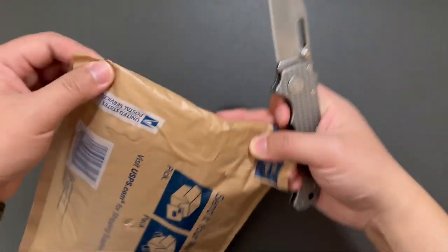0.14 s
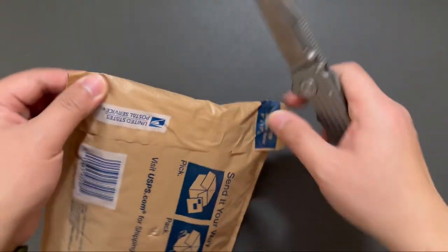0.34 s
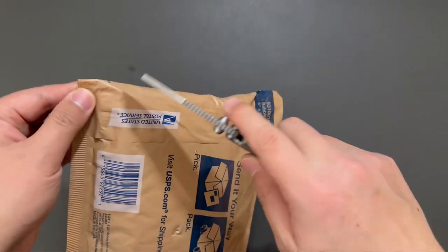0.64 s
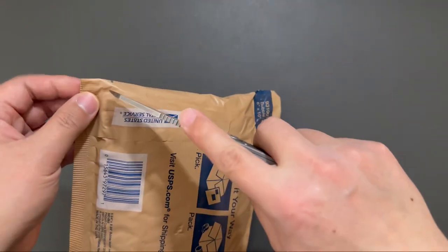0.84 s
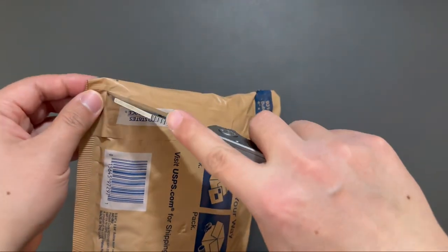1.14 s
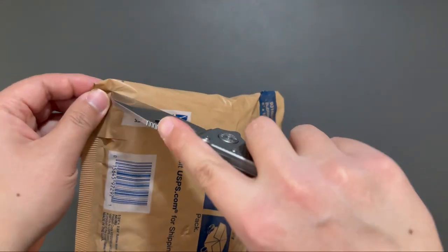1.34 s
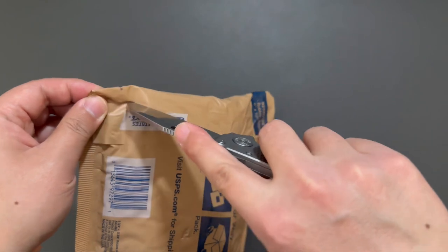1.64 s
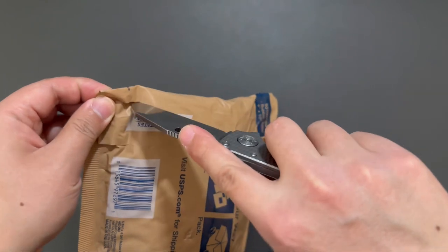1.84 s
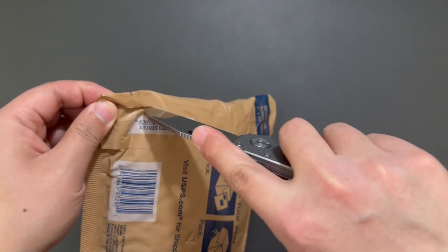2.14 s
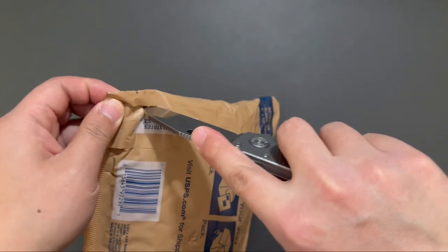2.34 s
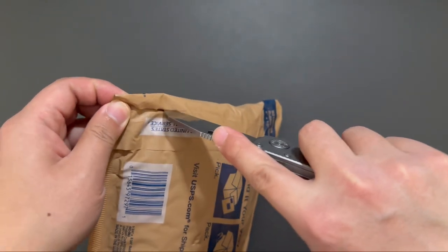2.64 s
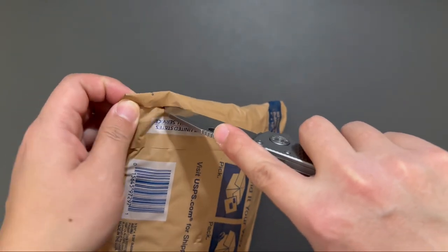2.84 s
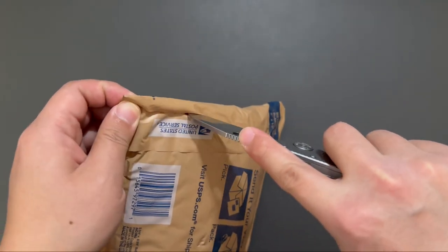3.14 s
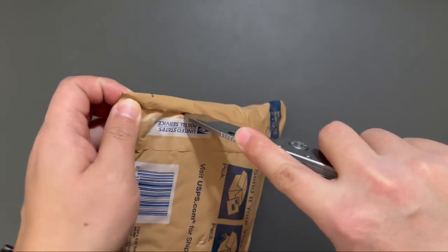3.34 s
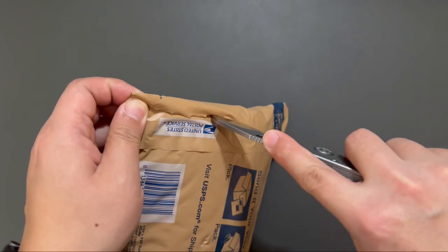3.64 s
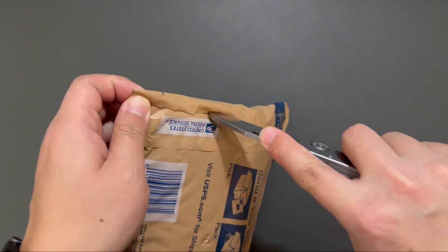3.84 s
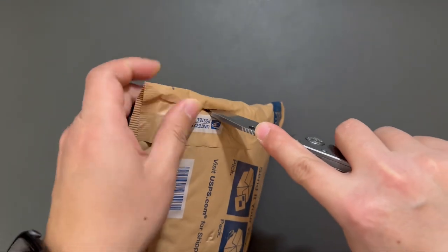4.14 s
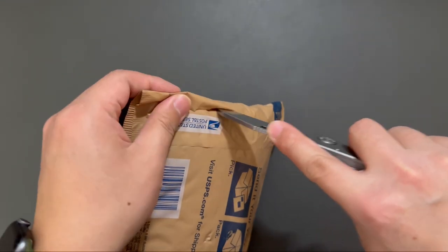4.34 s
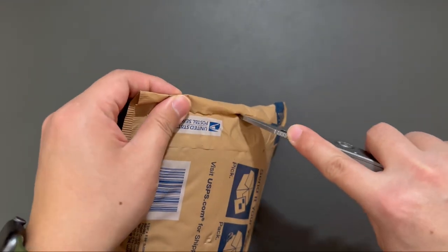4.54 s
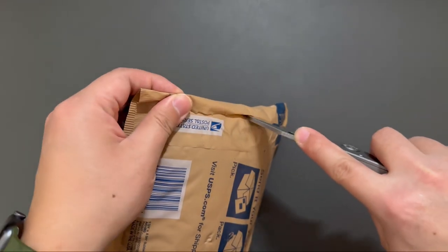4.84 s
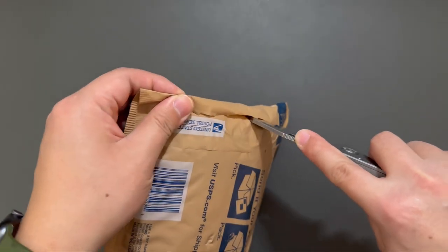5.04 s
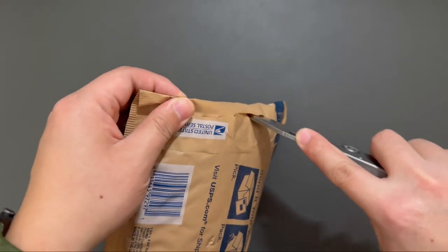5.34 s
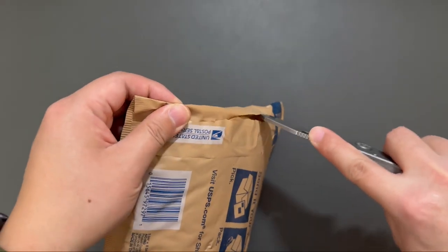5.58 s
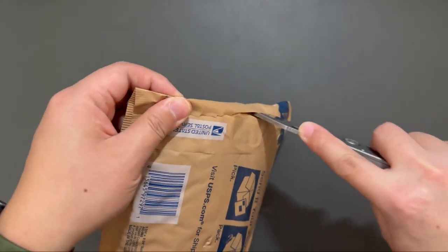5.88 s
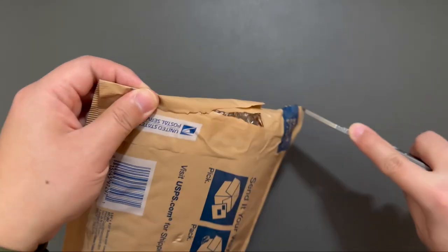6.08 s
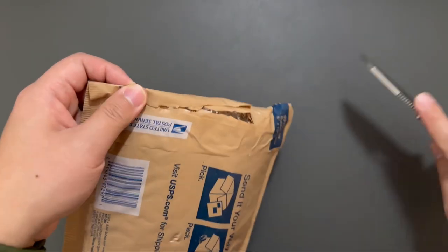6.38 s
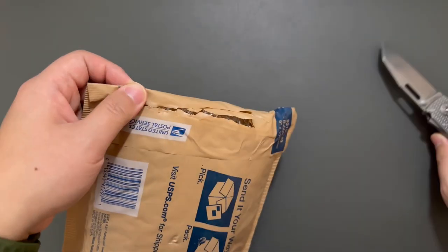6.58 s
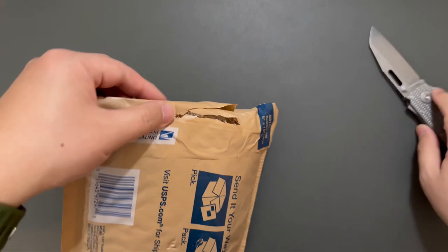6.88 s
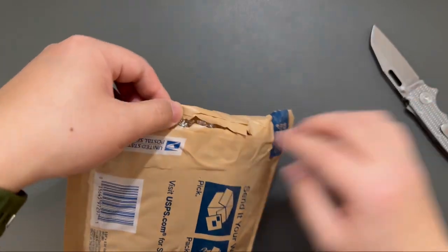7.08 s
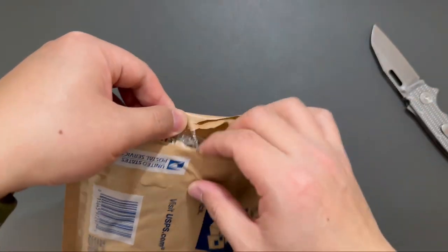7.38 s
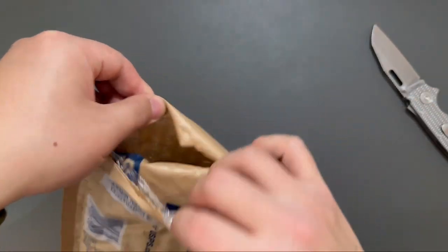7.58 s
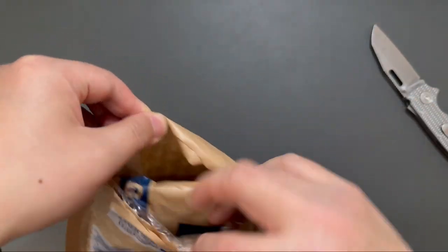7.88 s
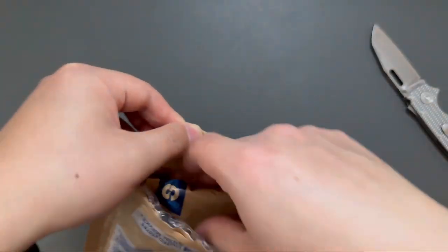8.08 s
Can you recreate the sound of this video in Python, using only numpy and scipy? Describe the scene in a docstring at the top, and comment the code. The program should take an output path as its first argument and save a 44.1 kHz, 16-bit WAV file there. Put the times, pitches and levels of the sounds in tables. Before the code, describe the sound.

Very close, dry sound of a padded paper envelope being opened over a desk in a small quiet room, with faint steady air noise and a low wavering hum throughout. From 0 to 0.3 seconds the paper rustles with a few crisp snaps, then thins to small ticks until about 1.5. Sharp crackles come near 1.7 and 2.1, another at 2.5. From 3 seconds a blade slits the paper in irregular tugs: clustered bright snaps and soft hollow pouch thumps, strong around 3.5, 4.5 and 4.8, continuing through 5.5 and peaking at 5.9 with a hard snap and bump. From 6.1 to 6.8 it is quieter, just light ticks. At about 6.9 the knife lands with a dull, briefly ringing desk knock. From 7.1 to 8.2 the envelope is pulled open with broad, dense rustling, crackles and low rubbing.

```python
"""A padded paper envelope is gripped, slit along its top with a pocket knife and pulled open over a desk.
Creases snap and crackle as sharp edges with short bursts of noise; sliding sheets rustle as flickering noise.
The stiff pouch thumps as ringing modes when jerked and rumbles as low noise when rubbed on the desk.
Knife, pouch and knuckles knock on the desk top, which rings too. The knife is laid down near the end.
The quiet room adds short echoes, steady air noise and a wavering motor hum."""
import sys
import numpy as np
from scipy import signal
from scipy.fft import rfft, irfft, next_fast_len
from scipy.io import wavfile

SR = 44100
rng = np.random.default_rng(int(sys.argv[2]) if len(sys.argv) > 2 else 0)


def undo_db(level):
    """Turn decibels back into plain size, where 20 dB means ten times bigger."""
    steps = np.asarray(level, float) / 20
    return 10 ** steps


def master(y):
    """Save y as 16-bit WAV."""
    cut = np.clip(np.atleast_2d(y).T, -1, 1)
    pcm = np.round(cut * 32767)  # scale
    wavfile.write(sys.argv[1], SR, pcm.astype(np.int16))


N = 362281   # length [samples]

# Levels in these tables are relative: the functions below add offsets to most of them.
# tugs of the blade or squeezes of the hand:
# (time of full strength [s], time held [s], rustle level [dB], dullness [dB])
TUG_EVENTS = [(0.08, 0.074, -45.5, -3.5), (0.168, .06, -43.5, -5), (0.4, 0.034, -55, 1.5),
              (1.08, 0.0089, -62, -1), (1.531, 0.062, -50, -2.5), (1.69, 0.017, -63, -15),
              (2.09, 0.066, -51, -15.5), (2.301, 0.0059, -49.5, -11), (2.487, 0.0027, -45, -3.5),
              (2.74, 0.16, -50.5, -14.5), (3.01, 0.031, -43.5, -8), (3.18, 0.014, -52, -9),
              (3.286, 0.0038, -47, -2.5), (3.431, 0.022, -46, -7), (3.5, 0.079, -47, -10),
              (3.699, 0.0035, -56, 5.5), (3.83, .24, -50.5, -5.5), (4.208, 0.0026, -46.5, -12),
              (4.309, 0.0051, -43, -2.5), (4.52, 0.0041, -41.5, -20), (4.831, 0.004, -40.5, -2),
              (5.118, 0.0084, -42.5, -8.5), (5.307, 0.011, -45, -2), (5.502, 0.026, -40.5, -3),
              (5.747, 0.043, -48.5, -6), (5.928, 0.0019, -31.5, -2), (6.01, 0.096, -49.5, 1),
              (6.377, 0.0045, -53, -3), (6.59, 0.027, -60.5, 9), (6.887, 0.0045, -40.5, -4.5),
              (7.16, 0.22, -43, -10.5), (7.41, 0.042, -35.5, -8), (7.5, 0.089, -38, -9),
              (7.66, 0.047, -54, 13), (7.827, 0.19, -45.5, -5.5), (8.079, 0.11, -40, -11)]
# fingers holding the envelope between tugs: (time [s], rustle level [dB], dullness [dB])
GRIP_CURVE = [(0, -51.5, 7.5), (.35, -55.5, 2.5), (.66, -67.5, -2.5), (1.24, -69, 2), (1.4, -63.5, -22),
              (1.92, -60, -26), (2.3, -85, 5), (2.9, -54.5, -6), (3.4, -65, -2), (3.76, -69, -2),
              (4.4, -55, -2), (5.0, -61.5, -7), (5.66, -65.5, 2), (6.3, -63.5, -14), (6.7, -59, -12.5),
              (7.1, -52.5, -2), (8.21, -50, -30)]
# creases buckling and fibres parting: (time [s], strength near 3.5 kHz [dB],
# fullness near 1.3 kHz against that [dB], brightness near 7.5 kHz against that [dB])
CREASE_SNAPS = [(0.084, -39, -11, -22), (0.1102, -24, -6, -7), (0.12, -41, 0, 1), (0.1284, -43.5, 2, 9),
                (0.166, -33, -8, -6), (0.1742, -30, -26, 6.5), (0.2205, -17.5, -6, -12.5),
                (0.24, -38, 4, -10), (0.2515, -27, -5, -28), (0.294, -49, 5, -11), (0.379, -41, -1, 15.5),
                (0.396, -45, -8, 5), (0.427, -50, 12, -10), (0.462, -44, -6, 2), (0.496, -49, -5, 6),
                (0.516, -46, 5, 3), (0.604, -35, -8, -5), (0.6881, -44.5, 12.5, -7), (0.762, -33, 5.5, -15),
                (0.7853, -31, 6.5, -9.5), (0.816, -38.5, 8, -4), (0.825, -35, -4, -3),
                (0.85, -33.5, -1.5, 0.5), (0.9982, -34, 9.5, -7), (1.0159, -31.5, -4, 1),
                (1.0242, -37.5, 0, -12), (1.0847, -52, -5, 12), (1.14, -49, 14, -8),
                (1.169, -34.5, -6.5, -9), (1.257, -30.5, -4.5, 0.5), (1.419, -43.5, 0, -12),
                (1.505, -49, 18.5, -9), (1.5404, -39, 0, -5), (1.5514, -35.5, 7.5, 8),
                (1.6133, -31.5, 2, -8), (1.636, -36, 0, 11), (1.6597, -24.5, -8, -17),
                (1.6742, -29.5, -5, 19.5), (2.0364, -34.5, 7, 5.5), (2.0606, -38, 2, 2),
                (2.0789, -16, -17, -4), (2.1105, -22.5, -19, -3), (2.292, -33, 4.5, 7),
                (2.4416, -36.5, 12, 2.5), (2.4885, -21, 2, -11), (2.5061, -30, 5, 3), (2.7194, -43, 15, -2),
                (2.7423, -31.5, -4, 15), (2.8576, -29, 0.5, 2), (2.9093, -32, -4, 7.5),
                (2.9623, -23.5, 0.5, -6), (2.986, -21.5, -1, -12), (3.0025, -20.5, 10, 6),
                (3.0071, -23, 6, 5.5), (3.021, -19, -1, -21), (3.03, -27.5, 8.5, 5.5),
                (3.044, -29.5, 8, -4), (3.1856, -28.5, 5, 7.5), (3.2949, -19.5, -11, -19),
                (3.31, -34, 1, -14), (3.3146, -32.5, -3, 6), (3.4118, -27.5, -9, 2.5),
                (3.4251, -27.5, -5, 0.5), (3.458, -23, 0, -6), (3.471, -24.5, 14.5, -1),
                (3.483, -26, -6, -5), (3.4906, -15.5, -6.5, -8.5), (3.517, -11, -0.5, -3.5),
                (3.5313, -27, -3, 6.5), (3.5756, -24, 3.5, 5), (3.81, -23, -4, -2),
                (3.9812, -31.5, -1.5, -2), (4.0024, -30.5, 4.5, 5.5), (4.055, -32.5, 4, 1),
                (4.0863, -31, -1, 4.5), (4.209, -32.5, 3.5, 9.5), (4.224, -34.5, 4, -1),
                (4.263, -34.5, -1, -2), (4.2987, -27, 8, 1.5), (4.318, -17, -34, -18), (4.35, -30, -10, -2),
                (4.367, -27.5, -6, -6.5), (4.4102, -33.5, 3.5, -1.5), (4.4772, -14, 0.5, -14.5),
                (4.4972, -18, 0, -12), (4.5063, -23, 11, -14), (4.511, -9.5, 1.5, -19),
                (4.5156, -16.5, -5, -5.5), (4.5276, -21, -4, -14), (4.531, -22, -2, -7),
                (4.597, -29, -18, -3), (4.6484, -25.5, -5.5, 0.5), (4.776, -35, -13, 6),
                (4.803, -25.5, -5, 4), (4.8189, -14, -13, -26), (4.848, -12.5, -5, -8),
                (5.018, -29.5, -2.5, -8.5), (5.1014, -32, 4, -4), (5.1141, -25.5, -12, -1.5),
                (5.1228, -21.5, -13, -13), (5.1688, -27, -3, -2.5), (5.1746, -28.5, -0.5, -9),
                (5.209, -31, -5, -7), (5.3016, -30, 3.5, -7.5), (5.36, -36, 2.5, -0.5),
                (5.459, -28.5, -6, -25), (5.488, -18.5, 7, -1.5), (5.495, -20, -6, -20),
                (5.5127, -13, -7, -11.5), (5.745, -28.5, -4, -26), (5.8046, -21.5, -7, -11),
                (5.8618, -22, -3.5, -17), (5.8935, -21, -0.5, -10), (5.902, -19, 2, -22),
                (5.916, -6.5, -8, -20), (5.9333, -14, -0.5, -3.5), (6.0159, -16.5, -16, -15.5),
                (6.0954, -45, 11.5, 2), (6.1534, -41, -10, 6), (6.1989, -37.5, -16.5, 2),
                (6.2307, -52, -12, 13.5), (6.3173, -49.5, 0, 17), (6.335, -38, -2, -4), (6.355, -34, 0, -8),
                (6.425, -35, -7, -35), (6.5698, -46.5, -1, 17), (6.5827, -32.5, 3.5, -1.5),
                (6.6225, -31, -5, 0.5), (6.8164, -37.5, 4.5, -12), (6.8868, -24.5, 2, -6.5),
                (6.94, -30.5, 3, -3.5), (7.1163, -33, 3, 0), (7.161, -37, 3, -12), (7.1886, -46, -8, -11),
                (7.2463, -29, 0, 7.5), (7.264, -49, 5, 24), (7.283, -32.5, 9, 8.5), (7.355, -40, 13, -3),
                (7.375, -33, -11, -6), (7.398, -32, 9, 1), (7.4009, -31, -3, 10), (7.4082, -33, 4, -2),
                (7.4174, -31.5, 14, 9.5), (7.435, -33, 5, 3), (7.4769, -28.5, 6.5, 5.5), (7.53, -41, 7, -3),
                (7.547, -42, 8, -6), (7.5724, -31, -2, -9), (7.579, -32, -5, -1), (7.6812, -23, 1, -11),
                (7.814, -39, -2, 13.5), (7.8381, -25.5, -1, -13), (7.8842, -38, 3, 12),
                (7.9295, -41.5, -10, 18), (7.9763, -38.5, 13.5, -7), (8.0773, -32.5, 5, 4),
                (8.094, -34, 1, 9), (8.185, -26.5, -1, 3)]
# tone colour of paper: (frequency [Hz], level per band [dB])
PAPER_COLOUR = [(350, -13), (800, -8), (1900, 2.5), (3800, -1), (4900, -2.5), (7300, 2.5), (10000, -1),
                (16000, 22)]
# the pouch jerked by blade or hand: (time [s], strength [dB])
POUCH_JOLTS = [(0.165, -34.5), (2.49, -36), (2.988, -45), (3.009, -31), (3.022, -32.5), (3.034, -31.5),
               (3.046, -41), (3.471, -29.5), (3.491, -28.5), (3.519, -34), (3.575, -24), (3.845, -38),
               (4.299, -33.5), (4.479, -31), (4.507, -25.5), (4.5138, -14), (4.519, -31), (4.819, -24),
               (4.847, -38), (5.111, -35), (5.486, -34), (5.514, -30.5), (5.894, -27.5), (5.921, -27),
               (5.936, -21), (5.972, -46), (7.239, -41), (7.299, -36), (7.397, -33), (7.418, -31.5),
               (7.479, -41), (7.519, -41.5), (7.737, -42.5), (7.84, -46), (8.075, -37.5), (8.184, -38)]
# ringing of the pouch: (frequency [Hz], level [dB], time to fall 60 dB before scaling [s])
POUCH_MODES = [(116, -12, 0.19), (196, -7, 0.12), (274.5, 0.5, 0.11), (358.7, -7, 0.22), (449, -1, 0.11),
               (640, 0.5, 0.063), (860, -6, 0.036)]
# hands and pouch dragging on the desk: (time [s], level [dB])
DESK_RUB = [(0, -55), (.12, -55), (.5, -64), (2.2, -64.5), (4.7, -60), (4.9, -62), (5.9, -60), (6.4, -65),
            (7.0, -51.5), (7.2, -50.5), (7.6, -54), (8.21, -53.5)]
# spectrum of the room noise: (frequency [Hz], level [dB])
AIR_COLOUR = [(18, -33), (30, 29), (123, 10), (168, 28.5), (404, 20), (838, -26), (2220, -38), (4940, -7),
              (7290, -6), (10000, -39.5), (13000, -89), (22000, -120)]
# knife, pouch and knuckles meeting the desk: (time [s], strength [dB])
DESK_KNOCKS = [(0.028, -56), (3.015, -34), (5.92, -26.5), (6.51, -48.5), (6.647, -37), (6.874, -25.5),
               (6.885, -12), (7.738, -39.5)]
# ringing of the desk top: (frequency [Hz], level [dB], time to fall 60 dB before scaling [s])
DESK_MODES = [(100.7, -1, 0.17), (146, 0.5, 0.15), (186.5, -11, 0.23), (242.7, -2.5, 0.21),
              (302, 3.5, 0.084), (384, 0, 0.067), (436, -17, 0.11), (537, -12, 0.11), (926, -4, 0.041)]
# the two microphone ports: (frequency [Hz], level of their sum [dB], level of their difference [dB])
PORT_RESPONSE = [(57.7, 3, -21.5), (290, -2, -18), (710, -2.5, -8), (2500, -2.5, -21), (5340, 1.5, -3.5),
                 (6900, 0.5, -24), (8620, 1.5, 3.5), (9860, -3, -6), (11320, -20, -4.5), (12500, -35, -28),
                 (14160, -28, -16), (15060, -14.5, -4), (16030, -14, -13), (16200, -37.5, -36)]

CONTROL_STEP = 40   # slow curves are computed once in this many samples


def rms_one(x):
    """Scale a signal to an average strength (rms) of 1."""
    return x / np.sqrt(np.mean(x ** 2) + 1e-20)


def in_time(rows):
    """Draw each column of a table as a curve over the whole scene."""
    seconds, *columns = np.transpose(rows)
    return [np.interp(np.arange(N) / SR, seconds, column) for column in columns]


def at_hz(points, hz, axis=1):
    """Read one column of a table at any frequency, along a logarithmic scale."""
    points = np.array(points)
    return np.interp(np.log(hz), np.log(points[:, 0]), points[:, axis])


def drift(rate_hz):
    """Slow random wandering of rms 1: noise smoothed twice, keeping what is slower than rate_hz."""
    r = np.exp(-2 * np.pi * rate_hz * CONTROL_STEP / SR)
    noise = rng.standard_normal(N // CONTROL_STEP + 2002)
    slow = signal.lfilter([1], [1, -2 * r, r * r], noise)[2000:]   # skip the filter's start
    return np.interp(np.arange(N) / CONTROL_STEP, np.arange(len(slow)), rms_one(slow))


def train(seconds, gains):
    """Clicks of given heights at given times."""
    clicks = np.full(N, 1e-18)
    places = np.clip(np.round(seconds * SR).astype(int), 0, N - 1)
    np.add.at(clicks, places, gains)
    return clicks


def filtered(x, order, hz, kind="low"):
    """Pass a sound through a smooth (Butterworth) filter."""
    return signal.sosfilt(signal.butter(order, hz, kind, fs=SR, output="sos"), x)


def handling():
    """Every tug swells, holds, lets go and settles; louder ones count more in the rustle's dullness."""
    rise_db_per_s, fall_db_per_s = 272, 325
    settle_db, settle_db_per_s = -11.5, 91   # the sheets go on unbending after a tug
    step_s = np.arange(0, N, CONTROL_STEP) / SR
    peak_s, held_s, level_db, dull_db = np.array(TUG_EVENTS).T[:, :, None]
    before = np.maximum(peak_s - step_s, 0)
    after = np.maximum(step_s - peak_s - held_s, 0)
    letting_go = undo_db(-fall_db_per_s * after) ** 2
    settling = undo_db(settle_db - settle_db_per_s * after) ** 2
    tug_power = undo_db(level_db - rise_db_per_s * before) ** 2 * (letting_go + settling)
    grip_db, grip_dull_db = (curve[::CONTROL_STEP] for curve in in_time(GRIP_CURVE))
    grip_power = undo_db(grip_db) ** 2
    total = tug_power.sum(axis=0) + grip_power
    blend_db = ((tug_power * dull_db).sum(axis=0) + grip_power * grip_dull_db) / total
    return [np.interp(np.arange(N) / SR, step_s, curve) for curve in (10 * np.log10(total), blend_db)]


def paper():
    """Snaps and crackle are an edge and a dying burst in each band; bending waves bring the lows late and long."""
    late_cycles, lead_s = 0.7, 0.0008   # each burst starts 0.8 ms before its sharp edge
    shortest_t60_s, burst_cycles = 0.006, 6.83   # a burst lasts both together, so low bands last longer
    edge_db = 13   # sharp edge over its burst
    snap_s, peak_db, full_db, bright_db = np.transpose(CREASE_SNAPS)
    rustle_db, dull_db = handling()

    # Random crackle: about 480 small creases a second, before clumping makes them uneven.
    chance = 480.0 * undo_db(2.5 * drift(25.0)) / SR
    born = np.flatnonzero(rng.random(N) < chance)
    crackle_db = rustle_db[born] + 2.5 + 3.26 * np.minimum(rng.exponential(1, len(born)), 3.5)
    pitch_hz = 2480.0 * 2 ** (2.0 * rng.standard_normal(len(born)))   # small creases ring high, large low

    centres_hz = 400 * 2 ** np.arange(0, 5.4, .5)   # half-octave bands
    luck = rng.standard_normal((len(snap_s), len(centres_hz)))
    out, together = 0, drift(26.0)
    for k, hz in enumerate(centres_hz):
        colour_db = np.array([at_hz([(1300, full), (3500, 0), (7500, bright)], hz)
                              for full, bright in zip(full_db, bright_db)])
        # Dullness acts below 3 kHz, in full from two octaves down.
        band_dull_db = (dull_db + 8.0) * np.clip(np.log2(3000 / hz) / 2, 0, 1)
        late_s = late_cycles / hz - lead_s
        strikes = train(snap_s + late_s, undo_db(peak_db + colour_db + 1.5 * luck[:, k] + 2.0))
        off_pitch_db = 6.4 * np.abs(np.log2(hz / pitch_hz))
        spread_db = 2.65 * rng.standard_normal(len(born))
        strikes += train(born / SR + late_s, undo_db(crackle_db + band_dull_db[born] - off_pitch_db + spread_db))
        t60_s = shortest_t60_s + burst_cycles / hz
        burst = signal.lfilter([1], [1, -undo_db(-60 / (t60_s * SR))], strikes)
        # Sheets sliding on each other flicker partly together, partly band by band.
        flicker_db = 2.2 * together + 1.0 * drift(31.0)
        sheen = undo_db(rustle_db + band_dull_db - 6.0 + flicker_db)
        edge = np.roll(strikes, round(lead_s * SR)) * undo_db(edge_db)   # the buckling rings the band once
        source = edge + (burst + sheen) * rng.standard_normal(N)
        limits_hz = [hz / 2 ** .25, min(hz * 2 ** .25, .45 * SR)]
        gain = undo_db(at_hz(PAPER_COLOUR, hz) - 10.0) / np.sqrt(.7 * hz / SR)   # evens out the band widths
        out = out + gain * filtered(source, 2, limits_hz, "band")
    return out


def struck(modes, seconds, db, spread_db, ring_scale, floor_hz, contact_hz, tail_db, tail_t60, tail_hz):
    """Soft blows ring every mode by a luck of its own; countless weak modes blur into a dying noise tail."""
    luck = rng.standard_normal((len(seconds), len(modes)))
    fade = signal.lfilter([1], [1, -undo_db(-60 / (tail_t60 * SR))], train(seconds, undo_db(db + tail_db)))
    out = filtered(fade * rng.standard_normal(N), 2, tail_hz)
    for k, (hz, mode_db, t60) in enumerate(modes):
        r = undo_db(-60 / (t60 * ring_scale * SR))   # decay in one sample
        w = 2 * np.pi * hz / SR   # turn in one sample
        clicks = train(seconds, undo_db(db + mode_db + spread_db * luck[:, k]))
        ringing = signal.lfilter([0, np.sin(w)], [1, -2 * r * np.cos(w), r * r], clicks)
        out = out + (-1) ** k * ringing   # neighbouring modes start in opposite directions
    out = filtered(out, 2, floor_hz, "high")
    return filtered(out, 1, contact_hz)   # a soft contact dulls the blow


def pouch():
    """The air-filled pouch booms in its modes when jerked and rumbles as low noise under rubbing hands."""
    seconds, peak_db = np.transpose(POUCH_JOLTS)
    thumps = struck(POUCH_MODES, seconds, peak_db - 1.5, spread_db=3.0, ring_scale=0.45, floor_hz=208,
                    contact_hz=1470, tail_db=-0.5, tail_t60=0.32, tail_hz=500)
    rumble = rms_one(filtered(rng.standard_normal(N), 2, [50, 450], "band"))
    rub_db = in_time(DESK_RUB)[0] + 3.46 * drift(4.6)
    return thumps + rumble * undo_db(rub_db)


def air():
    """Steady room noise, partly unlike on the two sides, and a motor hum of narrow, wavering noise."""
    air_db, hum_db = -72, -69
    hum_hz, hum_width_hz = 121, 5
    hz = np.maximum(np.arange(N // 2 + 1) * SR / N, 1)
    hum_shape = 1 / (1 + ((hz - hum_hz) / hum_width_hz) ** 2)
    white = rfft(rng.standard_normal((3, N)))
    # One scaling for both rows: the rms is taken over the two together.
    mid, side = undo_db(air_db) * rms_one(irfft(white[:2] * undo_db(at_hz(AIR_COLOUR, hz)), N))
    mid = mid + undo_db(hum_db) * rms_one(irfft(white[2] * hum_shape, N))
    return mid + side * [[1], [-1]]


def desk_knocks():
    """Knife, pouch and knuckles give dull knocks that ring the modes of the desk top."""
    seconds, peak_db = np.transpose(DESK_KNOCKS)
    return struck(DESK_MODES, seconds, peak_db - 5.0, spread_db=3.5, ring_scale=0.82, floor_hz=45.6,
                  contact_hz=1190, tail_db=5.0, tail_t60=0.49, tail_hz=385)


def room(x):
    """Echoes between walls: six feedback delays a side, duller on every round."""
    t60_s, wall_cut_hz = 0.085, 16000
    size = next_fast_len(N + SR)
    bins = np.arange(size // 2 + 1)
    one_sample = np.exp(-2j * np.pi * bins / size)   # delay by one sample, per frequency
    dull = np.exp(-2 * np.pi * wall_cut_hz / SR)
    wall_filter = (1 - dull) / (1 - dull * one_sample)
    walls = np.zeros((2, len(bins)), complex)
    lags = (rng.uniform(0.0035, 0.026, 12) * SR).astype(int)   # 3.5 to 26 ms, in samples
    for k, lag in enumerate(lags):
        delay = np.exp(-2j * np.pi * lag * bins / size)
        loop = undo_db(-60 * lag / SR / t60_s) * wall_filter * delay
        walls[k % 2] += loop / (1 - loop) * (-1) ** (k // 2)   # all rounds of the loop at once
    return irfft(rfft(x, size) * walls, size)[:, :N]


def scene():
    """Everything sounds close below the microphone, whose housing cuts the bass of near knocks."""
    near = paper() + pouch() + desk_knocks()
    near = filtered(near, 4, 35, "high")
    thin = filtered(near, 1, 400.0, "high")   # light walls return little bass
    return near + undo_db(-11) * room(thin) + air()


def roll_off(x):
    """The treble ends steeply here."""
    return signal.sosfilt(signal.butter(12, 17150, fs=SR, output="sos"), x)


def record(dry):
    """Two ports drift apart in phase towards the treble: their sum cancels, their difference grows."""
    hz = np.maximum(np.arange(N // 2 + 1) * SR / N, 1)
    mid = rfft((dry[0] + dry[1]) / 2)
    side = rfft((dry[0] - dry[1]) / 2)
    sum_gain = undo_db(at_hz(PORT_RESPONSE, hz, axis=1))
    difference_gain = undo_db(at_hz(PORT_RESPONSE, hz, axis=2))
    total = irfft(mid * sum_gain, N)
    apart = irfft(side * sum_gain - 1j * mid * difference_gain, N)   # -1j: a quarter turn of phase
    return roll_off(np.array([total + apart, total - apart]))


dry = scene()
out = record(dry)
master(out)
```